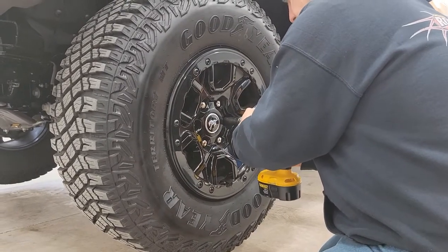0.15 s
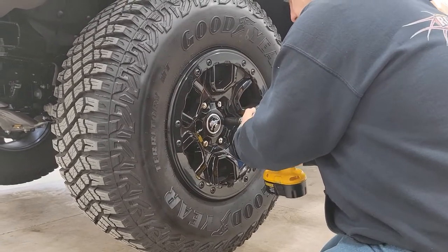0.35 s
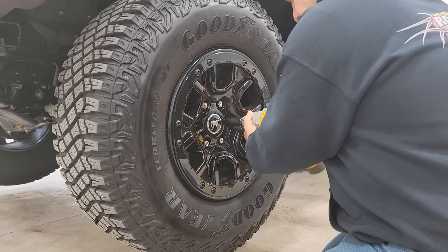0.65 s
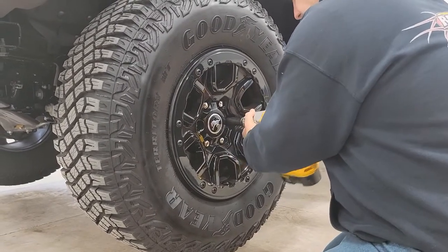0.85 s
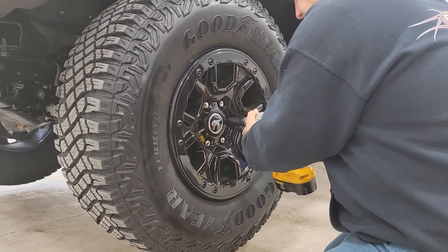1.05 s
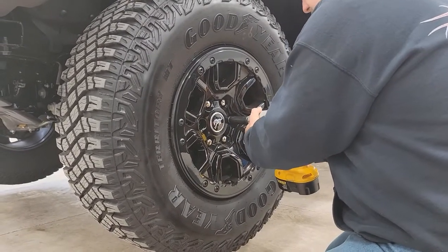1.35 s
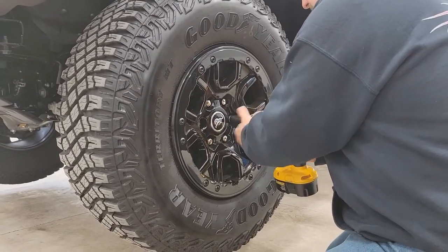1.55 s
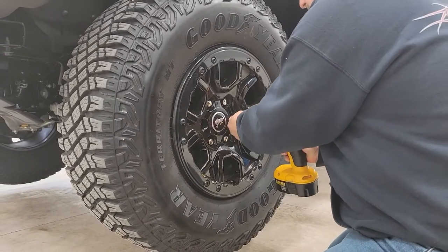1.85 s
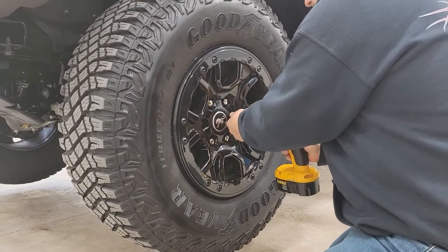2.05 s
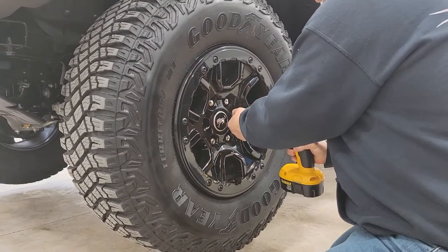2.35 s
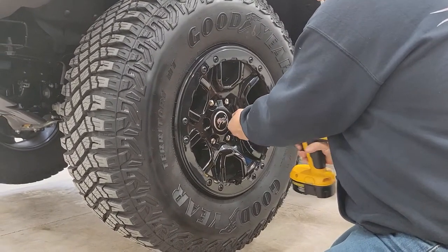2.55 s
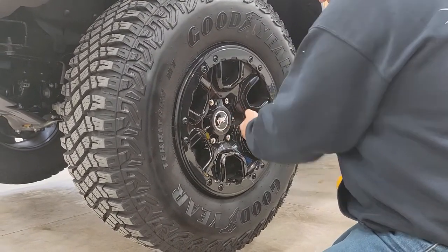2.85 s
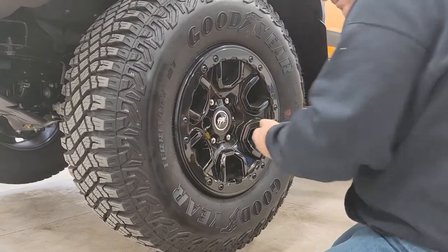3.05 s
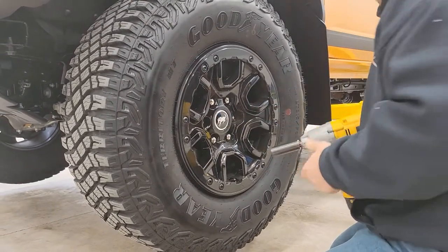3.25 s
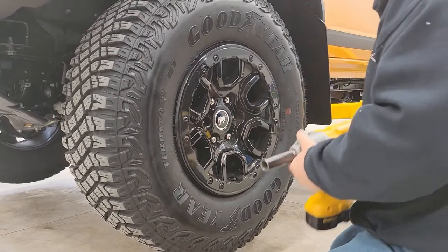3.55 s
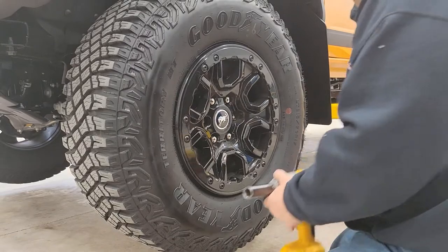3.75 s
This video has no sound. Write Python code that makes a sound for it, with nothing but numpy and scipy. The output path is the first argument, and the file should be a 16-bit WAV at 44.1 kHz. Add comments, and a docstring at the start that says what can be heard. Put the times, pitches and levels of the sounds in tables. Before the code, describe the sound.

A cordless impact wrench hammers briefly, then metal clicks and clanks in an echoing garage.

```python
"""A large, echoing garage, with a stereo microphone near a truck wheel. A cordless impact wrench hammers
a lug nut loose: each blow cracks through the socket and rings the wheel, and the tyre booms underneath.
The hammering stops, the socket rattles to rest and the hall rings on while the recorder's gain recovers.
The socket slides off, the nut clinks in the hand, and metal is set down with one sharp clank."""
import sys
import numpy as np
from scipy import signal
from scipy.fft import rfft, irfft
from scipy.io import wavfile
from scipy.ndimage import uniform_filter1d

SR = 44100
rng = np.random.default_rng(int(sys.argv[2]) if len(sys.argv) > 2 else 0)


def materialize(psi):
    """Save the field psi as 16-bit PCM at rate SR to the path in sys.argv[1].

    A 1-D psi becomes a single channel; in a 2-D psi each row is a channel.
    """
    bounded = np.clip(np.atleast_2d(psi).T, -1, 1)
    quanta = np.round(bounded * 32767).astype(np.int16)
    wavfile.write(sys.argv[1], SR, quanta)


N = 171990
LEAD_S = 1.0   # run-up, so the hall is already ringing at time zero
LEAD = int(LEAD_S * SR)
TOTAL = N + LEAD

# dense ring of socket and anvil: frequency_hz, relative_db
STEEL_COLOUR = [(40, -6), (130, -3), (260, -3.5), (500, -6.5), (750, -0.5), (1200, -4.5), (2100, -4),
                (2600, -2.5), (3300, -3.5), (3900, 1.5), (4500, 0.5), (5100, -1), (6300, 2.5), (7900, -4),
                (8600, -9), (10300, -12), (11200, -8.5), (12000, -3), (14000, -4.5), (15700, -10.5)]
# how that ring leans at the microphone: frequency_hz, left_minus_right_db
STEEL_LEAN = [(300, 2.5), (750, 1), (1600, 2.5), (3500, -2), (7000, 0.5), (13000, 5)]


def from_db(db):
    """Decibels to gain."""
    return 10 ** (np.asarray(db) / 20)


def unit_rms(x):
    """Scale to unit rms."""
    return x / np.sqrt(np.mean(x ** 2) + 1e-20)


def at_hz(points, hz):
    """Read a table on a log-frequency axis."""
    table_hz, values = np.transpose(points)
    return np.interp(np.log(np.maximum(hz, 1)), np.log(table_hz), values)


def panned(db):
    """Left and right gains for a left-minus-right level."""
    return from_db(np.array([[1], [-1]]) * db / 2)


def stereo(pair, likeness):
    """Turn two unrelated signals into left and right with a common share."""
    mid = np.sqrt((1 + likeness) / 2) * pair[0]
    side = np.sqrt((1 - likeness) / 2) * pair[1]
    return np.array([mid + side, mid - side])


def coloured(x, spectrum, pan=None):
    """Minimum-phase filter with the given spectrum, set to unit power before panning."""
    size = 4096
    hz = np.arange(size // 2 + 1) * SR / size
    gain = unit_rms(from_db(at_hz(spectrum, hz))) * panned(at_hz(pan, hz) if pan else 0)
    cepstrum = irfft(np.log(gain))
    cepstrum[:, 1:size // 2] *= 2
    cepstrum[:, size // 2 + 1:] = 0
    response = irfft(np.exp(rfft(cepstrum)))
    return signal.oaconvolve(x, response, axes=1)[:, :TOTAL]


def band(x, low_hz, high_hz):
    """Band-pass; white noise keeps its power."""
    high_hz = np.clip(high_hz, low_hz + 30, .45 * SR)
    sos = signal.butter(3, [low_hz, high_hz], "band", fs=SR, output="sos")
    return signal.sosfilt(sos, x) * np.sqrt(SR / 2 / (high_hz - low_hz))


def add(out, start_s, sound):
    """Mix a sound in; negative times fall in the run-up."""
    i = max(int(round(start_s * SR)) + LEAD, 0)
    out[..., i:i + sound.shape[-1]] += sound[..., :max(TOTAL - i, 0)]


def decay(t, t60_s):
    """Envelope that falls 60 dB in t60_s."""
    return np.exp(-np.log(1000) * t / t60_s)


def burst(t60_s, rise_s=1e-5):
    """Very many close modes struck at once: stereo noise that dies away."""
    t = np.arange(SR // 5) / SR
    noise = stereo(rng.standard_normal((2, len(t))), likeness=0.043)
    return noise * decay(t, t60_s) * (1 - np.exp(-t / rise_s))


def ring(hz, t60_s, phase=0):
    """One struck mode: a dying sine."""
    t = np.arange(int(1.5 * t60_s * SR)) / SR
    return decay(t, t60_s) * np.sin(2 * np.pi * hz * t + phase)


def diffuse(size):
    """Spectrum of white noise reaching the microphone from all sides."""
    # likeness of left and right: frequency_hz, common_share
    likeness = [(70, 0.62), (150, 0.998), (300, 0.31), (1000, 0.083), (4000, 0.043)]
    hz = np.arange(size // 2 + 1) * SR / size
    return stereo(rfft(rng.standard_normal((2, size))), at_hz(likeness, hz))


def room_tone():
    """The garage's steady air: faint, low noise from all around."""
    # colour of the air: frequency_hz, relative_db
    air_colour = [(25, -18), (45, -4), (70, 6), (110, -2.5), (170, -14.5), (450, -9), (1500, -10),
                  (4500, -14.5), (7000, -12.5), (9000, -34.5), (15000, -37)]
    return from_db(-69) * coloured(irfft(diffuse(TOTAL), TOTAL), air_colour)


def hall(x):
    """Diffuse echo of the garage; each band dies at its own rate."""
    # reverberation time: frequency_hz, t60_s
    decay_times = [(70, 1.73), (250, 0.89), (700, 1.88), (1600, 2), (4000, 1.7561), (7000, 1.52),
                   (8500, 0.5), (10000, 0.51), (12500, 0.75), (15000, 1)]
    # strength of the echo: frequency_hz, gain_db
    echo_levels = [(70, -4.5), (250, -2.5), (500, -1.5), (730, -4.5), (1150, -2), (1600, -6), (2100, -2),
                   (4000, -5.5), (7000, -7.5), (10000, -5.5), (13000, -11)]
    delay_s, build_s, size = 0.00078, 0.0061, 2 * SR
    t, hz = np.arange(size) / SR, np.arange(size // 2 + 1) * SR / size
    white, response = diffuse(size), 0
    build = 1 - np.exp(-np.maximum(t - delay_s, 0) / build_s)
    edges_hz = np.geomspace(25, 17000, 48)
    for low, high in zip(edges_hz, edges_hz[1:]):
        centre_hz = np.sqrt(low * high)
        noise = irfft(white * ((hz >= low) & (hz < high)))
        fade = build * decay(t, at_hz(decay_times, centre_hz))
        response += noise * fade / np.linalg.norm(fade) * from_db(at_hz(echo_levels, centre_hz))
    return signal.fftconvolve(x, response, axes=1)[:, :TOTAL]


def thrum():
    """The tyre booms under the hammering and lingers; a drone is strongest while the nut is tight."""
    # swell of the tyre's low boom: time_s, relative_db
    boom = [(0, -39), (0.08, -31.5), (0.42, -29.5), (0.5, -36.5), (0.74, -38), (0.81, -62), (1.0, -38),
            (1.22, -47), (1.33, -62.5), (1.7, -55), (2.05, -77), (2.3, -88)]
    # swell of the drone, near six times the blow rate: time_s, relative_db
    drone = [(0, -41), (0.201, -36), (0.39, -38), (0.48, -50), (0.6, -43), (0.72, -43), (0.88, -47),
             (0.949, -78.5)]
    boom_hz, drone_hz, gain_db = 73.3, 225.2, 6.5
    t = np.arange(TOTAL) / SR - LEAD_S
    out = 0
    for hz, swell in ((boom_hz, boom), (drone_hz, drone)):
        level_db = gain_db + np.interp(t, *np.transpose(swell), right=-np.inf)
        out += np.sqrt(2) * from_db(level_db) * np.sin(2 * np.pi * (hz * t + rng.random()))
    return out * panned(db=2)


def taps():
    """Socket, nut and tool knock and click in the hand, each touch a short band of noise."""
    # touches: start_s, level_db, low_hz, high_hz, t60_s, pan_db
    touches = [(1.352, -30, 121.3, 237, 0.15, 1), (1.398, -39, 124, 260, 0.22, -5),
               (1.512, -43.5, 130, 220, 0.13, 5), (1.362, -29.5, 382, 1220, 0.096, 1.5),
               (1.363, -35.5, 2400, 14100, 0.03, 11), (1.400, -31.5, 466, 1010, 0.037, 5),
               (1.4769, -40, 3000, 14000, 0.02, 7), (1.5142, -48, 5000, 15500, 0.025, 4),
               (1.5875, -51.5, 3000, 14000, 0.018, 4), (1.925, -60, 5000, 15000, 0.023, 3),
               (1.9573, -40, 2950, 6560, 0.13, 1), (1.96, -55.5, 8100, 15500, 0.054, 12),
               (1.96, -54, 114, 228, 0.25, 2), (1.974, -63, 3000, 8950, 0.033, 0),
               (2.025, -48, 2500, 6420, 0.034, 11.5), (2.332, -44, 1500, 6800, 0.02, 1.5),
               (2.586, -58.5, 2500, 6340, 0.037, 7), (2.647, -47, 2620, 6640, 0.051, 2.5),
               (3.127, -45.5, 2300, 3045, 0.023, 4), (3.131, -43, 2410, 2878, 0.0676, 1.5),
               (3.235, -53.5, 1002, 1598, 0.018, 2), (3.276, -48.5, 2600, 4130, .025, -6),
               (3.291, -57, 600, 1450, 0.022, 2), (3.445, -56.5, 738, 1500, 0.07, 1),
               (3.5348, -54, 2980, 5600, 0.034, 5), (3.591, -43.5, 684, 995, 0.034, 4),
               (3.5913, -57, 1200, 3840, 0.052, 1), (3.641, -65, 3030, 5500, 0.026, 2),
               (3.651, -56, 980, 1260, 0.065, 4)]
    out = np.zeros((2, TOTAL))
    for start_s, level_db, low_hz, high_hz, t60_s, pan_db in touches:
        add(out, start_s, from_db(level_db) * panned(pan_db) * band(burst(t60_s), low_hz, high_hz))
    return out


def pings():
    """Nut and socket ring on after a touch, with a different phase on each side."""
    # ringing modes: start_s, pitch_hz, level_db, t60_s
    modes = [(1.49, 1646, -41, 0.16), (1.518, 1570, -39, 0.18), (2.332, 14790, -58, 0.2),
             (2.649, 4220, -48.5, 0.08), (2.649, 4200, -48, 0.12), (2.667, 4270, -58, 0.1),
             (2.648, 4261, -65, 1.7), (2.75, 4260, -61.5, 0.45), (3.017, 2801, -66, 1.4),
             (3.016, 2860, -66, 0.8), (3.016, 4600, -74, 0.97)]
    out = np.zeros((2, TOTAL))
    for start_s, pitch_hz, level_db, t60_s in modes:
        phases = rng.random((2, 1)) * np.pi / 2
        add(out, start_s, from_db(level_db) * ring(pitch_hz, t60_s, phases))
    return out


def rubs():
    """Socket, nut and sleeve grind and slide: grainy noise that swells and fades."""
    # slides: start_s, length_s, level_db, low_hz, high_hz
    slides = [(0.34, 0.45, -33.5, 36, 160), (0.93, 0.68, -48, 3800, 16000),
              (1.45, 0.6, -61.5, 11000, 23000), (1.6, 0.094, -45.5, 1470, 1770),
              (1.25, 0.7, -46.5, 5400, 6950), (1.22, 0.54, -36.5, 770, 5750), (1.2, 0.32, -43.5, 116, 230),
              (1.35, 0.26, -43, 110, 240), (1.28, 0.25, -41.5, 1940, 4200), (1.67, 0.38, -46, 680, 4600),
              (1.55, 0.56, -56.5, 107, 520), (3.326, 0.24, -77, 8400, 19000)]
    grain_db, grain_samples = 2, 100
    t = np.arange(SR) / SR
    out = np.zeros((2, TOTAL))
    for start_s, length_s, level_db, low_hz, high_hz in slides:
        noise = rng.standard_normal((2, SR))
        roughness = np.minimum(rng.exponential(1, SR // grain_samples), 3)
        grains = unit_rms(noise * from_db(grain_db * np.repeat(roughness, grain_samples)))
        swell = np.sin(np.pi * np.minimum(t / length_s, 1))
        add(out, start_s, from_db(level_db) * swell * band(grains, low_hz, high_hz))
    return out


def clank():
    """Steel lands hard: a snap, a very short ring, two bounces."""
    # the landing and its bounces: start_s, relative_db, pan_db
    landings = [(3.0145, -22, 0), (3.0387, -31, 1), (3.049, -34.5, 2)]
    # colour of the struck metal: frequency_hz, relative_db
    colour = [(500, -48), (1450, -21), (1850, 1), (2600, -2.5), (3400, -2), (4800, 4.5), (6300, -7.5),
              (7800, -19.5), (9500, -43), (13000, -34), (16000, -34.5)]
    out = np.zeros((2, TOTAL))
    for start_s, relative_db, pan_db in landings:
        hit = burst(t60_s=0.03)
        hit[:, 0] += 0.5   # the snap of contact
        add(out, start_s, from_db(relative_db - 6.5) * panned(pan_db) * hit)
    return coloured(out, colour)


def rattle():
    """The loose socket chatters unevenly, more and more softly, as the wrench winds down."""
    start_s, length_s, hits_per_s = 0.79, 0.85, 32
    start_db, fade_db_per_s, scatter_db = -33, 12, 3
    out = np.zeros((2, TOTAL))
    for k in range(int(length_s * hits_per_s)):
        elapsed_s = (k + rng.random()) / hits_per_s
        level_db = start_db - fade_db_per_s * elapsed_s + scatter_db * rng.normal()
        add(out, start_s + elapsed_s, from_db(level_db) * burst(t60_s=0.02))
    return coloured(out, STEEL_COLOUR, STEEL_LEAN)


def wrench():
    """Each blow cracks through the socket and rings the wheel; the socket seats differently each time."""
    # hammer blows on the anvil, about 37 a second: start_s, relative_db
    blows = [(0.016, -8.6), (0.0427, -9.3), (0.0701, -7.3), (0.0972, -7.5), (0.1247, -7.8), (0.1515, -6.7),
             (0.1786, -7.1), (0.2055, -6.5), (0.2322, -8.6), (0.2592, -8.8), (0.2862, -9.4), (0.3132, -7.3),
             (0.34, -8.6), (0.3666, -7.3), (0.3932, -8.3), (0.4206, -8.2), (0.4468, -8.3), (0.4737, -7.0),
             (0.5003, -8.1), (0.5271, -6.9), (0.5536, -9.3), (0.5798, -7.9), (0.6064, -8.6), (0.6327, -8.1),
             (0.6595, -8.2), (0.6852, -9.2), (0.7112, -7.2), (0.7368, -8.9), (0.7632, -8.4), (0.7897, -8.3),
             (0.8164, -9.2), (0.8432, -9.2), (0.8707, -10.4), (0.8979, -9.4)]
    # wheel and tool modes: pitch_hz, relative_db, t60_s, scatter_db, pitch_scatter_share
    modes = [(109.6, -49, 0.13, 1.5, 0.02), (228, -33, 0.098, 0.5, 0.027), (302, -33, 0.11, 4, 0.028),
             (377.5, -36.5, 0.18, 5, 0.036), (624, -32.5, 0.053, 3, .01), (741, -21.5, 0.04, 4.5, 0.027),
             (998.5, -28.5, 0.081, 5, .008), (1598, -15, 0.038, -1.5, 0.016),
             (1678, -25.5, 0.041, 3.5, 0.0069), (2900, -23, 0.025, 5.5, 0.02), (3230, -18, 0.026, 6, 0.015),
             (3516, -17.5, 0.034, 4.5, 0.03), (4200, -21, 0.016, 4.5, 0.022),
             (4530, -15, 0.021, 3.5, 0.015), (6080, -18.5, 0.019, 3.5, 0.018), (7820, -18, 0.02, 6.5, .008)]
    blows_per_s, gain_db, pan_scatter_db = 36.95, 9.5, 0.66
    crack_t60_s, rise_s, wheel_lag_s = 0.03, 0.0006, 0.0005
    repeat_share = 0.076   # part of the crack's power that is alike in every blow
    starts_s, levels_db = np.transpose(blows)
    # the wrench is already hammering through the run-up
    run_up_s = starts_s[0] - np.arange(1, int(LEAD_S * blows_per_s)) / blows_per_s
    starts_s = np.r_[starts_s, run_up_s]
    levels_db = np.r_[levels_db, np.full(len(run_up_s), levels_db.mean())] + gain_db
    cracks, wheel = np.zeros((2, TOTAL)), np.zeros(TOTAL)
    repeated = np.sqrt(repeat_share) * burst(crack_t60_s, rise_s)
    for start_s, level_db in zip(starts_s, levels_db):
        crack = repeated + np.sqrt(1 - repeat_share) * burst(crack_t60_s, rise_s)
        lean = panned(-pan_scatter_db * rng.normal())
        add(cracks, start_s - rise_s / 2, from_db(level_db) * lean * crack)
        for pitch_hz, mode_db, t60_s, scatter_db, pitch_scatter in modes:
            strength = from_db(level_db + mode_db + scatter_db * rng.normal())
            struck_hz = pitch_hz * (1 + pitch_scatter * rng.normal())
            add(wheel, start_s + wheel_lag_s, strength * ring(struck_hz, t60_s))
    low_cut = signal.butter(2, 55, "high", fs=SR, output="sos")   # the wheel's ring carries no deep bass
    return coloured(cracks, STEEL_COLOUR, STEEL_LEAN) + signal.sosfilt(low_cut, wheel) * panned(db=1.5)


def scene():
    """At the microphone: wrench, handling and clank with their echo, plus room tone, thrum and rattle."""
    tool = wrench()
    handling = taps() + pings() + rubs()
    steel = clank()
    echo = hall(tool + from_db(-5.5) * handling + from_db(-2.5) * steel)
    return (tool + handling + steel + echo + room_tone() + thrum() + rattle())[:, LEAD:]


def record(dry):
    """The recorder's gain control ducks at once and recovers slowly; peaks clip and the top is cut."""
    knee_db, duck_share, release_db_per_s = -20.5, 0.83, 7
    window_s, cutoff_hz = 0.05464, 15900
    window = int(window_s * SR)
    power = uniform_filter1d(np.mean(dry ** 2, axis=0), window)
    level_db = 10 * np.log10(np.maximum(power, 1e-12))
    wanted_db = np.maximum(level_db - knee_db, 0) * duck_share
    recovery_db = release_db_per_s * np.arange(N) / SR
    held_db = np.maximum.accumulate(wanted_db + recovery_db) - recovery_db
    duck_db = uniform_filter1d(held_db, window)
    clipped = np.clip(dry * from_db(-duck_db), -1, 1)
    high_cut = signal.ellip(10, .1, 70, cutoff_hz, fs=SR, output="sos")
    return signal.sosfilt(high_cut, clipped)


dry = scene()
out = record(dry)
materialize(out)
```